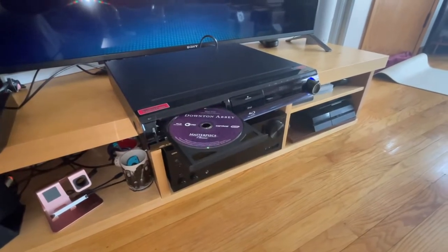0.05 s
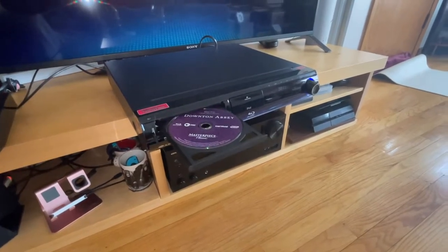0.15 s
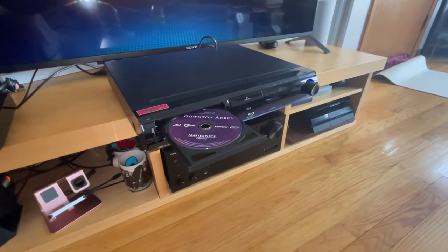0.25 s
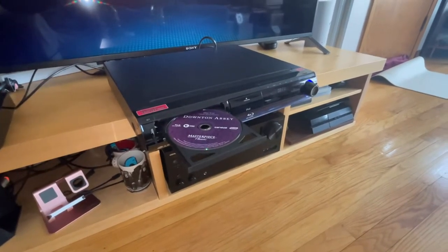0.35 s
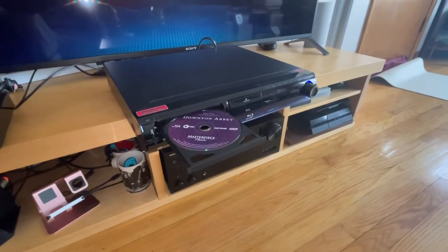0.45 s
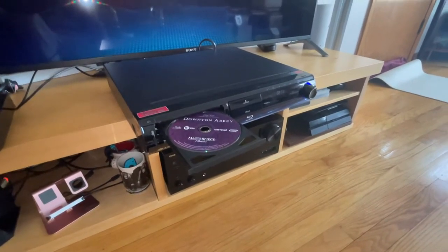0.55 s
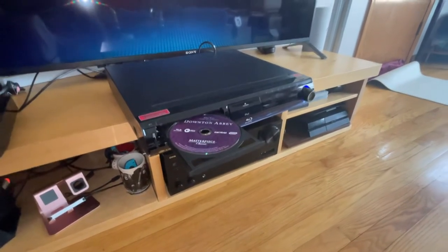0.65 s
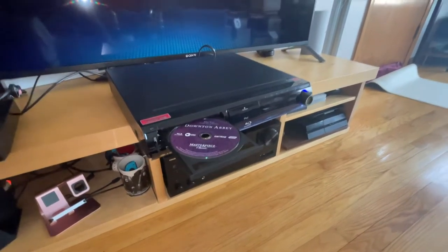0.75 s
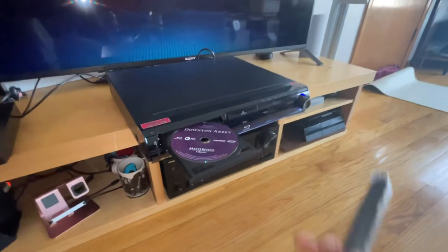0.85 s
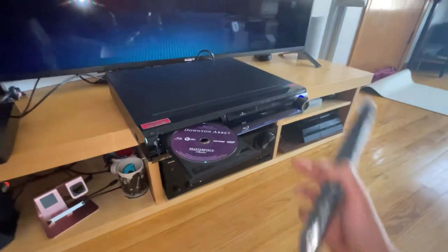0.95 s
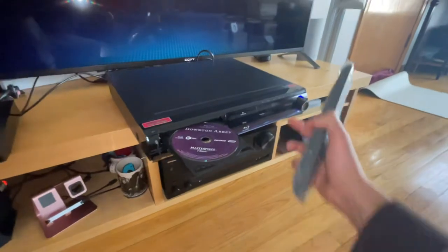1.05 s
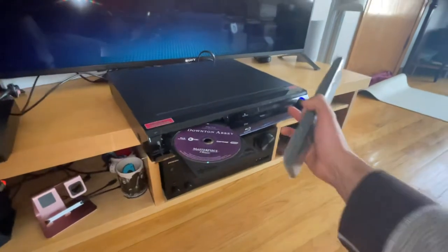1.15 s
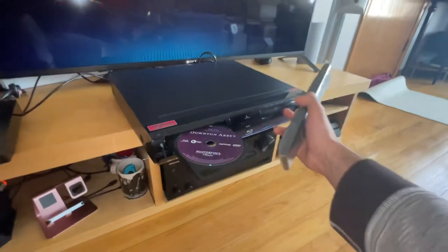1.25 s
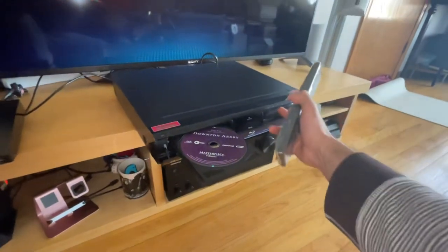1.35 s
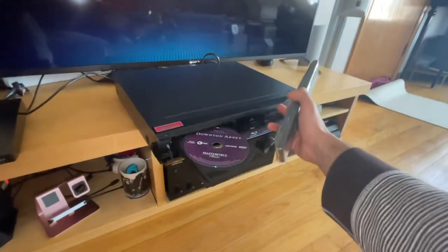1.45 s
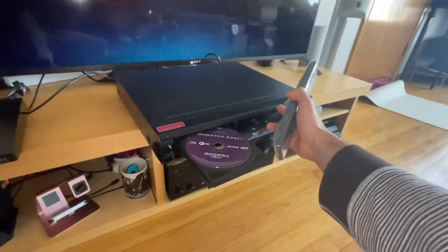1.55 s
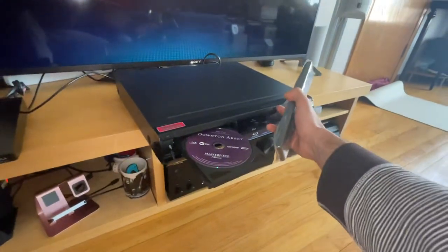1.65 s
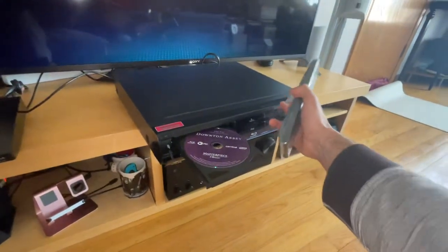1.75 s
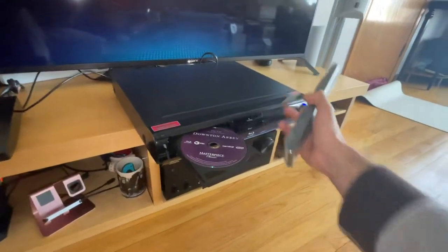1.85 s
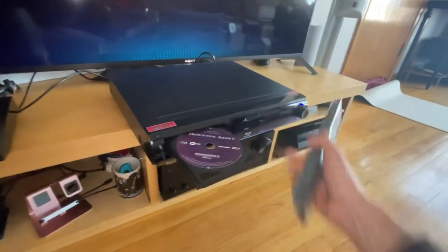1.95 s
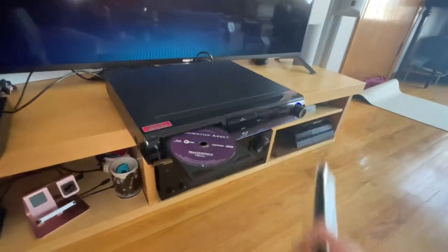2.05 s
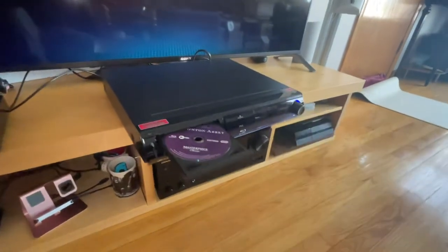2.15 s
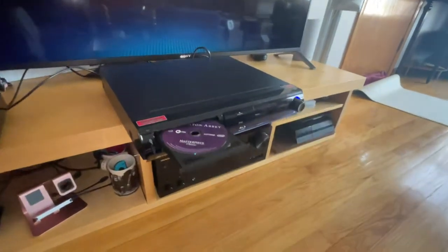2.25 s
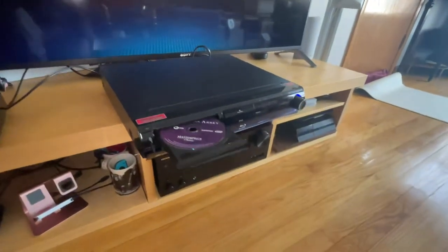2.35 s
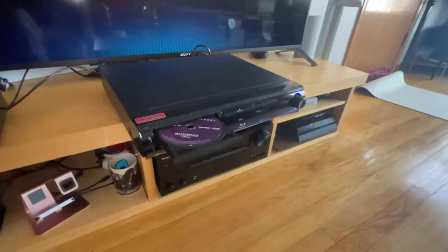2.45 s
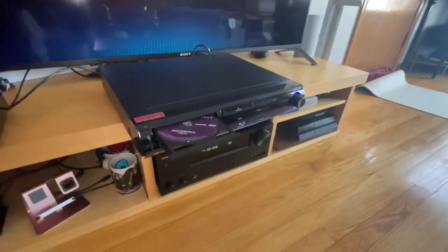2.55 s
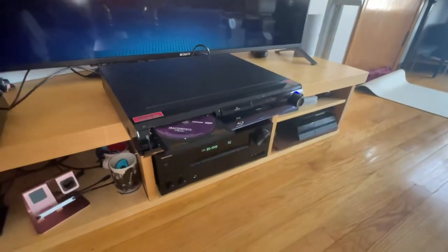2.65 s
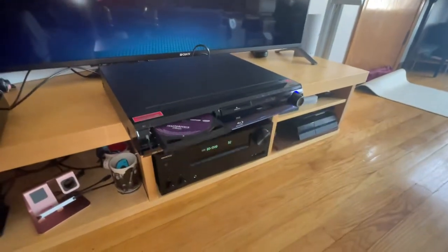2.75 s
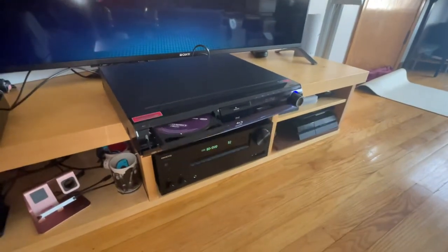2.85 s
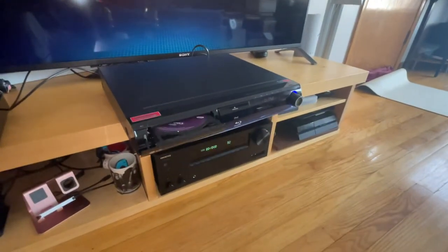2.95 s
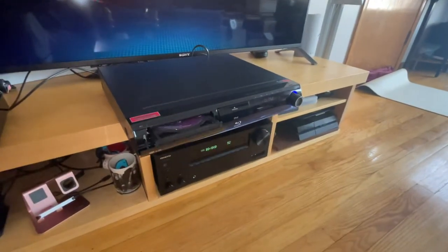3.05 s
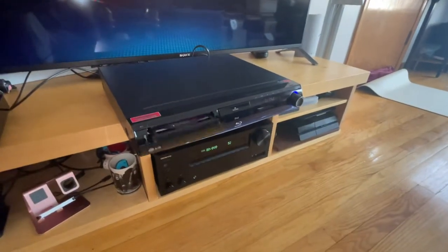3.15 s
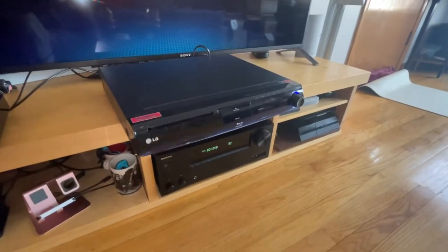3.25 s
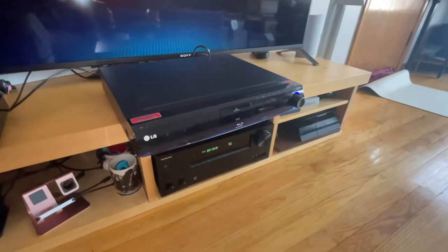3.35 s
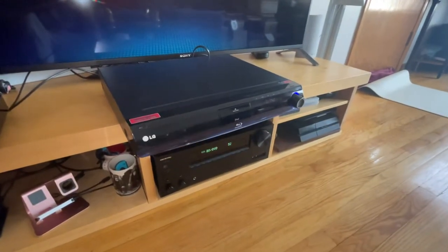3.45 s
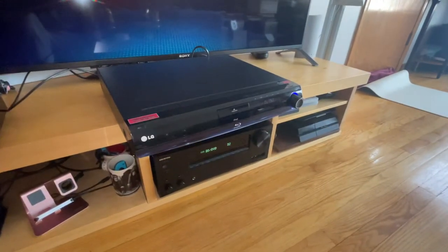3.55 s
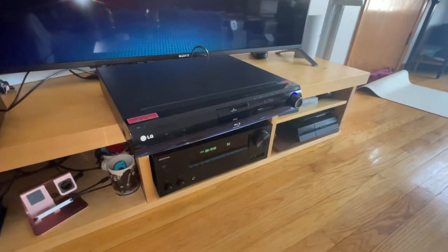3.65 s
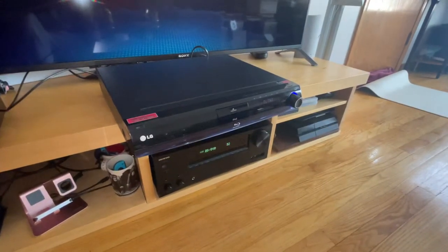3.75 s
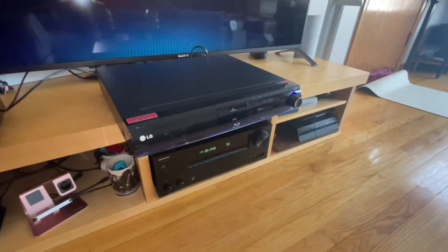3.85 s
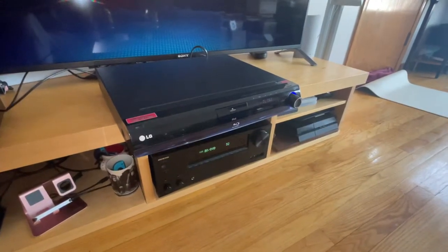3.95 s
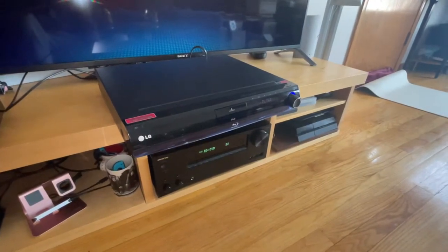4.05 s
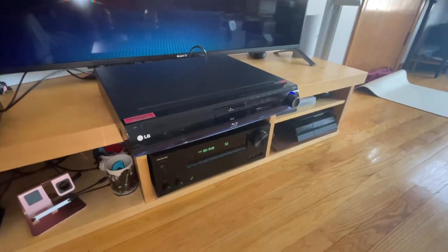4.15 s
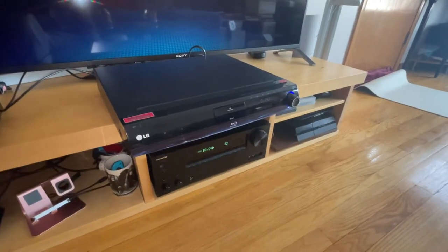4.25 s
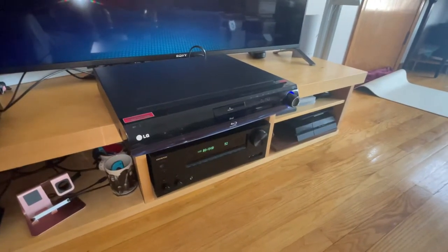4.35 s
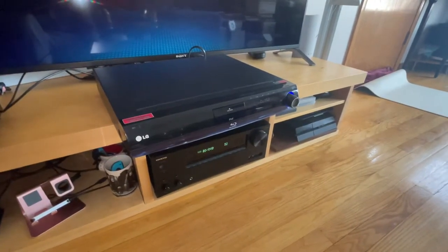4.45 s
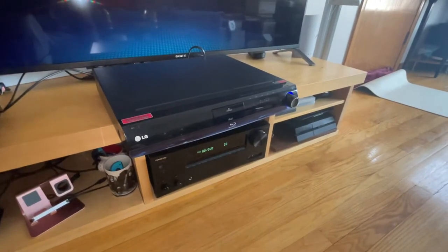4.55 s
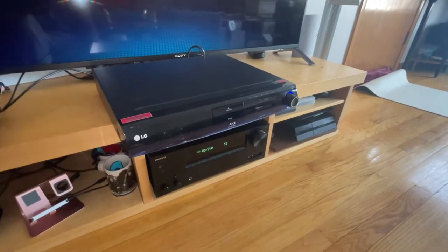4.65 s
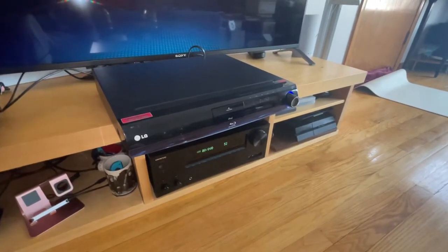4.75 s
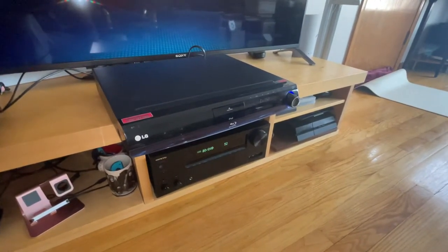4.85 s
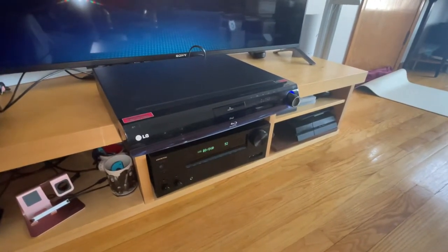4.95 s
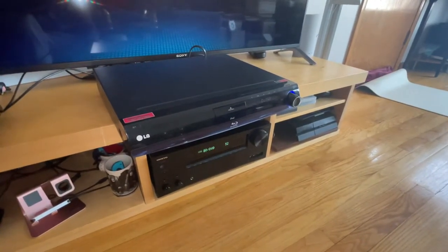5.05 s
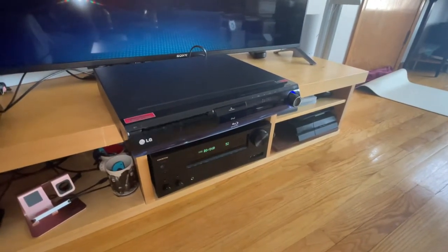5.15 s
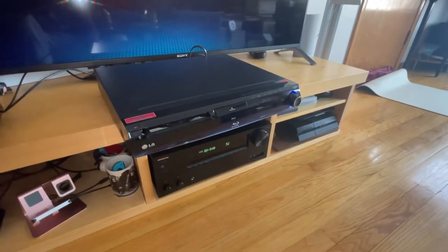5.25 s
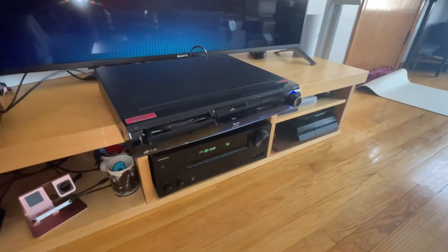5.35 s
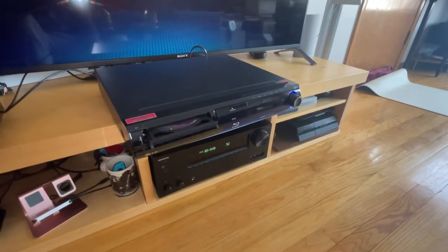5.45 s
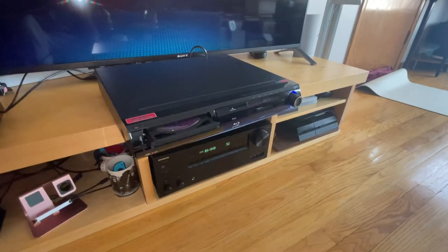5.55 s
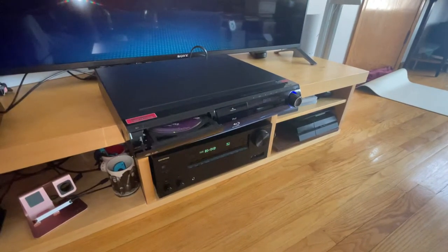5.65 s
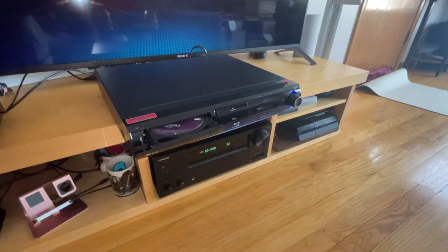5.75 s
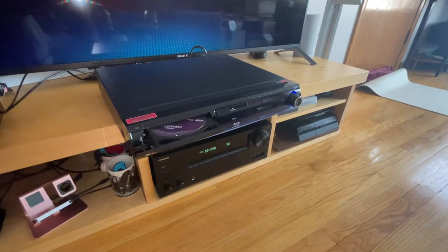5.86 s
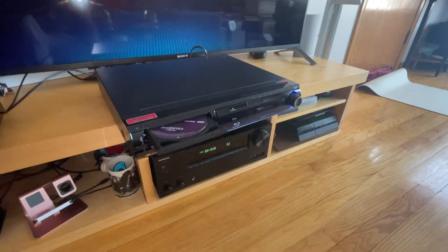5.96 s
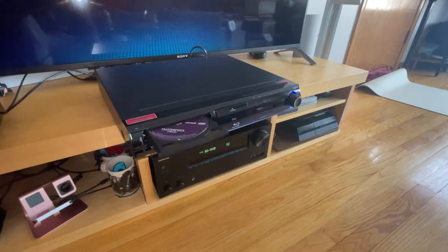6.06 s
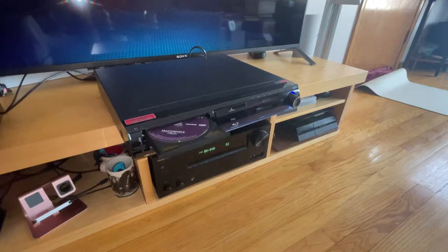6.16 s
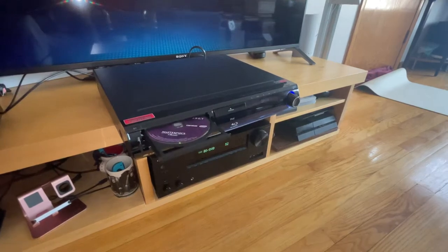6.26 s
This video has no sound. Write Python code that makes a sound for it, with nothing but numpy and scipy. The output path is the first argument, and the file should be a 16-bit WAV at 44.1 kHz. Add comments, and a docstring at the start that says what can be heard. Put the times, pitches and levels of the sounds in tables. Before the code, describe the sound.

A quiet, modest living room heard close up, with low rumble, faint air and electronic hum throughout. From 0 s a disc player's motor drones low and pulsing, its tones beating gently. Small plastic ticks at 0.4-0.5 s and 0.8 s mix with soft treble hiss swells; near 1 s a remote is picked up with a tiny dry scrape and tick. Sparse ticks follow around 1.3-1.7 s. At 2 s a knock and short judder start the tray, hissing and whirring inward while the motor sinks in pitch and fades by 2.9 s; a crisp double click lands at 2.46 s. At 3.14 s the latch snaps and rattles, then cracks hardest at 3.31 s with a bright ping and thuds. Near quiet, with faint ticks, until 4.88 s: dull bump, rapid clatter from 4.95 s, hollow clack at 5.05 s. From 5.2 s the tray slides out in softer hiss, with slight ticks, to the end at 6.3 s.

```python
"""Faulty disc player in a quiet living room: the latch snaps, its pawl pings, skipped teeth and judder
ring the chassis, the carriage thuds and clacks; all are contacts driving resonances, with a room tail.
The tray slides in and later out: fluttering hiss plus grains of gear contact. A motor, summed as
orders of its rotation, runs down. A hand lifts a remote: shell scrapes, plastic ticks.
Behind: brief swells of treble hiss, low rumble, faint air, electronic hum."""
import sys
import numpy as np
from scipy import signal
from scipy.fft import rfft, irfft, next_fast_len
from scipy.io import wavfile

SR = 44100
rng = np.random.default_rng(int(sys.argv[2]) if len(sys.argv) > 2 else 0)


def log_audio(samples):
    """Write samples as a 16-bit WAV file to the path given in sys.argv[1]."""
    # one column per channel
    frames = np.atleast_2d(samples).T
    # limit to full scale, then quantise
    limited = np.clip(frames, -1, 1)
    pcm = np.round(limited * 32767).astype(np.int16)
    wavfile.write(sys.argv[1], SR, pcm)


N = 278271
TIME = np.arange(N) / SR

# room reverberation: f/Hz, t60/s
ROOM_T60 = [(100, 0.59), (500, 0.417), (2000, 0.364), (6000, 0.343), (13000, 0.09)]
# left-right correlation of noise and tail: f/Hz, correlation/1
LIKENESS = [(50, 0.38), (150, 0.833), (300, 0.21), (600, -0.188), (1500, -0.231), (6000, 0.031),
            (14000, 0.09)]
# level of left over right: f/Hz, level/dB
LEFT_LEAD = [(110, .5), (200, -2), (350, -1.5), (550, -2.5), (900, 3), (1350, 4), (2300, .5), (4600, .5),
             (6500, 9), (8000, 5), (11000, .5)]
CUTOFF_HZ, TREBLE_EDGE_HZ = 16200, 12700

# electronics hum: f/Hz, level/dB
HUM = [(59.5, -62.5), (98.5, -65), (120, -74.5), (197.5, -68.5), (246, -70.5), (295, -80)]
# room rumble level over time: t/s, level/dB re RUMBLE_DB
RUMBLE_LEVEL = [(0, -51.5), (2.2, -48.5), (3, -55), (3.9, -54.5), (4.4, -58.5), (5.9, -56), (6.31, -61)]
RUMBLE_DB, AIR_DB = -1.0, -68.5   # overall levels
# rumble spectrum: f/Hz, relative level/dB
RUMBLE_COLOUR = [(25, -17), (40, -5.5), (56, -2.5), (80, -1), (120, -4), (170, -8), (250, -7), (330, -9.5),
                 (420, -23), (700, -28), (1500, -73.5)]
# air spectrum: f/Hz, relative level/dB
AIR_COLOUR = [(250, -30), (470, -0.5), (750, -6.5), (1300, -7), (2000, -18), (3100, -25), (4500, -31.5),
              (7000, -23), (9500, -38.5), (12000, -40.5), (15000, -65)]

# hiss swells: peak t/s, level/dB, rise/s per 20 dB, fall/s per 20 dB
HISS_SWELLS = [(.46, -65.5, 0.0645, 0.08), (.66, -66, 0.1945, 0.1251), (.87, -64.5, 0.0963, 0.0236),
               (.985, -62.5, 0.1324, 0.0977), (1.11, -69, 0.27, 0.59)]
# hiss swell spectrum: f/Hz, relative level/dB
HISS_COLOUR = [(600, -9), (1500, -0.5), (2700, -5.5), (4200, -5.5), (7500, -4), (9500, -3.5), (12000, -10),
               (14000, -23.5)]
# remote scrapes as it is picked up: peak t/s, level/dB
SCRAPES = [(.868, -67), (0.979, -55)]
# remote shell resonances: f/Hz, width/Hz, relative level/dB
SHELL_MODES = [(3954, 607, -2.5), (4496, 445, 0.5), (5510, 850, -5.5), (6580, 1240, -9)]
SCRAPE_RISE_S, SCRAPE_FALL_S = 0.0297, 0.0109   # per 20 dB
SLIPS_PER_S = 5000

# plastic ticks: t/s, snap level/dB, snap tilt/dB per octave, snap contact/s, knock level/dB, knock f/Hz
TICKS = [(.421, -43.5, 0, .0025, -50, 1200), (.442, -45, 1, .003, -50, 1284),
         (.484, -48, -1.5, .004, -51, 1100), (.793, -53, -2, .004, -45.5, 1423),
         (1.005, -51, 2, .002, -70, 1404), (1.318, -68, -3, .004, -52, 680),
         (1.563, -52, 3, .0035, -47.5, 1280), (1.645, -68, -3, .004, -55, 1490),
         (1.708, -53, -1, .004, -58, 1700), (1.9645, -47, -3.5, .007, -41, 1100),
         (1.969, -53, -3, .004, -34, 1440), (1.998, -60, -4, .005, -46, 1950),
         (2.040, -45, 4, .002, -54, 1155), (3.146, -50, -2, .005, -32, 2100),
         (3.565, -65, 0, .004, -62, 860), (3.614, -75, -3, .003, -43, 820),
         (3.945, -65, 0, .003, -66, 1200), (4.877, -56, -13, .012, -44, 1150),
         (4.949, -45, -4, .004, -34, 2000), (4.960, -54, -3, .003, -35, 1700),
         (4.992, -50, 0, .004, -35, 950), (5.020, -55, -3, .003, -42, 1100),
         (5.0545, -45, -1.5, .003, -42, 1120), (5.063, -45, -2, .002, -45, 1000),
         (5.299, -63, -4, .008, -50, 1750), (5.315, -65, -4, .007, -50, 1600),
         (5.486, -68, -3, .005, -50, 1070)]
# tick snap resonances: f/Hz, width/Hz, relative level/dB
SNAP_MODES = [(2500, 1400, -1), (4400, 1800, 0), (6800, 2200, 0), (11000, 4500, -3)]
# hollow knock resonances: ratio to knock f/1, width/Hz, relative level/dB
KNOCK_MODES = [(.65, 300, -6), (.96, 130, 4), (1.12, 178, -0.5), (1.65, 550, -10.5)]
KNOCK_CONTACT_S, KNOCK_EDGE_RATIO = .0026, 1.6   # dull above this multiple of its pitch

# tray clicks over its guide: t/s, level/dB
GUIDE_CLICKS = [(2.4595, -37.5), (2.4622, -34.5)]
# guide resonances: f/Hz, width/Hz, relative level/dB
GUIDE_MODES = [(990, 110, 9), (1900, 300, -2), (2790, 300, -3), (3700, 400, -3), (4470, 350, 2),
               (6400, 600, 1), (7450, 700, 1), (8400, 400, 0), (9350, 400, -4), (11100, 600, -5)]
# carriage drops free, clack and bounce: t/s, level/dB
CLACKS = [(5.0545, -28), (5.0635, -37)]
# carriage resonances: f/Hz, width/Hz, relative level/dB
CLACK_MODES = [(497, 22, 0), (592, 28, 1), (850, 150, -10), (1045, 55, -2.5), (1135, 65, -.5),
               (1250, 90, -9), (1420, 80, -15), (1810, 100, -17), (2320, 80, -17)]

# tray runs in, then out: start t/s, stop t/s, settled level/dB, settling time/s
TRAY_RUNS = [(1.965, 3.2, -70.5, 0.68), (5.222, 6.31, -75.5, 0.334)]
TRAY_SURGE_DB = 6.0   # extra level at first
TRAY_START_S, TRAY_STOP_S = 0.094, .35   # per 20 dB
# tray binds on its rails before the latch: peak t/s, level/dB, rise/s per 20 dB, fall/s per 20 dB
BIND = (3.12, -59, .05, .03)
# tray hiss spectrum: f/Hz, relative level/dB
SLIDE_COLOUR = [(400, 8), (900, 7.5), (1500, -1), (2200, -1), (3200, -16), (5000, -5), (7200, -16),
                (9500, -5.5), (12000, -12.5), (14000, -59)]
# gear and rail whirr resonances: f/Hz, width/Hz, relative level/dB per root Hz of width
WHIRR_MODES = [(2050, 300, 7), (3400, 600, -.5), (3900, 500, -1), (6000, 700, -1.5), (7150, 700, -2),
               (8150, 350, 1), (9800, 600, -3), (11450, 800, -4)]
WHIRR_GRAINS_PER_S, WHIRR_SPREAD_DB = 700, 3.5
WHIRR_DB, WHIRR_FLICKER_DB = -4.0, 3.0   # level re hiss; each resonance flickers as the load shifts

# motor speed: t/s, speed/turns per s
SPEED = [(0, 12.58), (.4, 12.76), (1, 12.86), (1.65, 13.0), (1.85, 12.69), (2.1, 12.0), (2.4, 11.35),
         (2.65, 9.9), (2.9, 8.8)]
FULL_TURNS_PER_S = 12.8
SPEED_POWER = 5.76   # vibration grows with this power of speed
# strong orders: multiple/1, level/dB, creep/dB per s, dip t/s, dip depth/dB, dip half-width/s
STRONG_ORDERS = [(5, -42, 0, 1.797, 20, 0.412), (8, -39.5, -3, 1.07, 14.5, 0.592),
                 (11, -55.5, 0, 0.23, 11.5, 0.33), (16, -58.5, 3, 0.697, 14, 0.277)]
# weaker orders, swelling and fading together: multiple/1, level/dB re UPPER_DB
UPPER_ORDERS = [(7, -0.5), (13, 0.5), (14, -7), (18, -2), (20, -3.5), (21, 1), (24, -8), (26, -11),
                (29, -11), (32, -22)]
UPPER_DB, UPPER_PEAK_S, UPPER_FADE_DB_PER_S, UPPER_WAVER_DB = -57.5, .6, 5.0, 1.5

# carriage bumps its stops, a panel booms: t/s, level/dB, f/Hz, width/Hz
THUDS = [(3.14, -41, 305, 12), (3.3125, -31, 520, 55), (3.331, -33, 580, 35), (3.356, -38, 310, 20),
         (3.374, -40, 400, 70), (4.879, -47, 304, 40), (4.904, -44, 340, 25), (4.992, -37, 377, 50),
         (5.018, -34, 260, 60), (5.085, -44, 335, 14), (5.303, -51, 370, 20), (5.489, -55, 480, 25)]
# pawl hits as the latch catches: t/s, level/dB
PAWL_HITS = [(3.138, -36.5), (3.157, -37), (3.3116, -20)]
# sprung pawl resonances: f/Hz, width/Hz, relative level/dB
PAWL_MODES = [(6400, 170, 8), (6850, 300, 3), (12480, 600, -6), (15800, 500, -17)]
# gear teeth judder as the drive takes up a load, shifting the chassis resonances:
# peak t/s, level/dB, rise/s per 20 dB, fall/s per 20 dB, hold/s, pitch ratio/1, tilt/dB per octave, contacts/s
JUDDERS = [(1.972, -54.5, .04, .06, .03, 1.25, .3, 1000), (3.145, -52.5, .07, .17, .04, .97, 1.3, 1200),
           (3.335, -42.5, .03, .05, .056, .97, .2, 1400), (3.43, -61, .05, .1, .02, 1.0, .5, 1500),
           (4.885, -54, .02, .06, .045, 1.02, -.5, 1200), (4.954, -53, .01, .06, .02, 1.35, 3.3, 900),
           (4.978, -43, .04, .02, .046, .98, -2.2, 500), (5.08, -52, .03, .09, .035, 1.0, -3.5, 1200),
           (5.18, -66, .2, .45, .02, 1.0, 0, 1500)]
# chassis resonances: f/Hz, width/Hz, relative level/dB
CHASSIS_MODES = [(125, 30, -5), (222, 50, -5), (305, 45, 2), (350, 50, 1.5), (420, 60, -3.5), (495, 45, 1),
                 (548, 50, 0), (640, 60, -2.5), (750, 100, -9), (925, 60, -3), (1000, 100, -4),
                 (1100, 80, -5), (1215, 75, -6), (1390, 110, -10), (1584, 110, -15), (1820, 140, -18),
                 (2070, 160, -17), (2420, 90, -19), (2830, 390, -27)]
# cam skips teeth in a row, each blow a step from the last:
# t/s, teeth/1, spacing/s, snap level/dB, snap step/dB, chassis level/dB, chassis step/dB, contact/s
SKIPS = [(3.102, 2, 0.019, -52, 18, -50, 8, 0.0043), (3.137, 2, 0.01818, -22, -3, -36, 3.5, 0.00222),
         (3.311, 3, .0215, -21, -14, -28, -3, 0.00299), (4.876, 2, .036, -68, -8.5, -42, -2, 0.009),
         (4.9485, 4, .0222, -38, -3, -46, 2, 0.004), (5.054, 2, .01, -50, 5, -42, -3, 0.00137)]
# plastic latch resonances: f/Hz, width/Hz, relative level/dB
LATCH_MODES = [(1234, 339, -3), (2090, 330, 0), (2750, 500, -7.5), (3400, 700, -11), (4400, 900, -8),
               (5840, 1350, -7), (6438, 872, -4), (7137, 700, -8), (8653, 850, -13), (9660, 1400, -18),
               (12000, 1700, -16)]


def from_db(db):
    """Decibels to gain."""
    return 10 ** (np.asarray(db) / 20)


def rms_one(x):
    """Scale to rms 1."""
    return x / np.sqrt(np.mean(x ** 2) + 1e-20)


def in_time(rows):
    """Each column of a curve at every sample."""
    s, *columns = np.transpose(rows)
    return [np.interp(TIME, s, c) for c in columns]


def at_hz(points, hz):
    """Read a spectrum on a log-frequency axis."""
    table_hz, values = np.array(points).T
    return np.interp(np.log(hz), np.log(table_hz), values)


def drift(rate_hz):
    """Slow random motion of spread 1: noise at SR / 40 through a double pole."""
    r = np.exp(-80 * np.pi * rate_hz / SR)
    white = rng.standard_normal(N // 40 + 2002)
    slow = signal.lfilter([1], [1, -2 * r, r * r], white)[2000:]   # drop the filter's start
    return np.interp(np.arange(N) / 40, np.arange(len(slow)), rms_one(slow))


def swell(peak_s, db, rise_s, fall_s, hold_s=0):
    """Gain that rises to a peak, holds and dies away; rise and fall are times per 20 dB."""
    rising = np.maximum(peak_s - TIME, 0) / rise_s
    falling = np.maximum(TIME - peak_s - hold_s, 0) / fall_s
    return from_db(db - 20 * np.minimum(rising + falling, 10))


def swells(rows):
    """Joint gain of several swells, added in power."""
    return np.sqrt(sum(swell(*row) ** 2 for row in rows))


def noise_bands(size):
    """Half-octave bands of stereo noise, mixed from mid and side by their correlation: (Hz, band)."""
    edges = 27 * 2 ** np.arange(0, 9.6, .5)
    white = rng.standard_normal((2, 2, size))
    for k, (low, high) in enumerate(zip(edges, edges[1:])):
        sos = signal.butter(3, [low, high], "band", fs=SR, output="sos")
        mid, side = signal.sosfilt(sos, white[k % 2])   # neighbouring bands use separate noise
        hz = np.sqrt(low * high)
        alike = np.clip(at_hz(LIKENESS, hz), -1, 1)
        yield hz, np.sqrt(1 + alike) * mid + np.sqrt(1 - alike) * side * [[1], [-1]]


def noise(colour):
    """Stereo noise of a given spectrum, rms 1."""
    return rms_one(sum(from_db(at_hz(colour, hz)) * band for hz, band in noise_bands(N)))


def fluttering_hiss(gain, colour, grain_db, flutter_db):
    """Coloured noise whose level flutters, each band also in its own way."""
    hiss = sum(band * from_db(at_hz(colour, hz) + grain_db * drift(19)) for hz, band in noise_bands(N))
    return rms_one(hiss) * gain * from_db(flutter_db * drift(54))


def resonate(force, modes):
    """Parallel resonances, scaled so that a unit click peaks at 1."""
    def bank(x):
        out = 0
        for k, (hz, width_hz, db) in enumerate(modes):
            r = np.exp(-np.pi * width_hz / SR)
            poles = [1, -2 * r * np.cos(2 * np.pi * hz / SR), r * r]
            ring = (1 - r * r) * signal.lfilter([1, 0, -1], poles, x + 1e-18)
            out = out + (-1) ** k * from_db(db) * ring
        return out
    return bank(force) / np.abs(bank(signal.unit_impulse(SR // 20))).max()


def retuned(modes, ratio, tilt_db):
    """Resonances shifted in pitch and tilted per octave."""
    return [(hz * ratio, width_hz, db + tilt_db * np.log2(hz / modes[0][0])) for hz, width_hz, db in modes]


def contacts(times_s, levels_db, lengths_s, chatter):
    """Each contact is a push amid a brief dying chatter of the surfaces."""
    force, age = np.zeros(N), TIME[:SR // 16]
    for s, db, length_s in zip(times_s, levels_db, lengths_s):
        envelope = np.exp(-age / length_s) * (1 - np.exp(-2 * age / length_s))
        push = rng.standard_normal(len(age)) * envelope
        push *= chatter / np.linalg.norm(push)
        push[np.argmax(age >= length_s / 4)] += np.exp(-length_s / 0.00371)   # long contacts are soft
        start = round(s * SR)
        force[start:start + len(age)] += from_db(db) * push
    return force


def strike(s, db, length_s, modes, chatter):
    """One contact rings a set of resonances."""
    out, start = np.zeros(N), round(s * SR)
    span = slice(start, start + SR // 4)
    out[span] = resonate(contacts([s], [db], [length_s], chatter)[span], modes)
    return out


def in_room(x, pan_db, wet_db, lag_s=0.00028):
    """Direct sound reaches the left side first; floor and walls add a diffuse tail."""
    age = TIME[:SR // 2]
    tail = sum(band * from_db(-60 * age / at_hz(ROOM_T60, hz)) for hz, band in noise_bands(len(age)))
    tail = tail * (1 - np.exp(-(age / 0.0015) ** 2))
    tail /= np.linalg.norm(tail, axis=1, keepdims=True)
    left = x * from_db(pan_db / 2)
    right = np.interp(TIME - lag_s, TIME, x) * from_db(-pan_db / 2)
    reverb = signal.fftconvolve(x[None], tail, axes=1)[:, :N]
    return np.array([left, right]) + from_db(wet_db) * reverb


def soften(x):
    """Low-pass: dull above TREBLE_EDGE_HZ."""
    return signal.sosfilt(signal.butter(14, TREBLE_EDGE_HZ, fs=SR, output="sos"), x)


def steer(x, left_lead):
    """Set the left-right level difference per frequency, half on each side."""
    size = next_fast_len(N)
    lead_db = at_hz(left_lead, np.maximum(np.fft.rfftfreq(size, 1 / SR), 1))
    side_gains = from_db(lead_db * np.array([[.5], [-.5]]))
    return irfft(rfft(x, size) * side_gains, size)[:, :N]


def background():
    """Low rumble, faint air and electronic hum of wavering phase."""
    rumble_db, = in_time(RUMBLE_LEVEL)
    rumble = noise(RUMBLE_COLOUR) * from_db(rumble_db + RUMBLE_DB)
    hum = 0
    for hz, db in HUM:
        hum = hum + np.sqrt(2) * from_db(db) * np.sin(2 * np.pi * hz * TIME + 1.27 * drift(0.95))
    return rumble + hum + noise(AIR_COLOUR) * from_db(AIR_DB)


def hiss_swells():
    """Brief swells of fluttering treble hiss."""
    return fluttering_hiss(swells(HISS_SWELLS), HISS_COLOUR, grain_db=1.03, flutter_db=1.03)


def remote():
    """Tiny dense slips excite the plastic shell of the remote."""
    slips = (rng.random(N) < SLIPS_PER_S / SR) * rng.standard_normal(N)
    gain = swells([(s, db, SCRAPE_RISE_S, SCRAPE_FALL_S) for s, db in SCRAPES])
    scrape = rms_one(resonate(slips, SHELL_MODES)) * gain
    return in_room(scrape, pan_db=1.5, wet_db=-12.5, lag_s=.00002)   # close by, so nearly dry


def hollow_knock(s, db, hz):
    """A short woody knock around one pitch."""
    modes = [(ratio * hz, width_hz, mode_db) for ratio, width_hz, mode_db in KNOCK_MODES]
    ring = strike(s, db, KNOCK_CONTACT_S, modes, chatter=.55)
    edge_hz = min(KNOCK_EDGE_RATIO * hz, SR / 4)
    return signal.sosfilt(signal.butter(2, edge_hz, fs=SR, output="sos"), ring + 1e-18)


def ticks():
    """Plastic parts tick: a broad snap with its own brightness, and a hollow knock at its own pitch."""
    snap, knock = 0, 0
    for s, snap_db, tilt_db, length_s, knock_db, knock_hz in TICKS:
        snap = snap + strike(s, snap_db, length_s, retuned(SNAP_MODES, 1, tilt_db), chatter=1.787)
        knock = knock + hollow_knock(s, knock_db, knock_hz)
    snap = in_room(snap, pan_db=1.5, wet_db=-4.5, lag_s=.00003)
    return snap + in_room(knock, pan_db=2.0, wet_db=-5.0, lag_s=.00008)


def clacks():
    """Clean, hard contacts: the tray on its guide, and the carriage dropping free."""
    guide = sum(strike(s, db, .001, GUIDE_MODES, chatter=.3) for s, db in GUIDE_CLICKS)
    carriage = sum(strike(s, db, .0008, CLACK_MODES, chatter=.08) for s, db in CLACKS)
    guide = in_room(guide, pan_db=1.0, wet_db=-5.0, lag_s=.00002)
    return guide + in_room(carriage, pan_db=0.5, wet_db=-8.0, lag_s=.00006)


def tray_gain():
    """Each run starts with a surge of friction, settles and stops."""
    gain = 0
    for start_s, stop_s, db, settle_s in TRAY_RUNS:
        run = swell(start_s, db, TRAY_START_S, TRAY_STOP_S, stop_s - start_s)
        surge = np.exp(-(np.maximum(TIME - start_s, 0) / settle_s) ** 2)
        gain = gain + run * from_db(TRAY_SURGE_DB * surge)
    return gain


def whirr():
    """Uneven grains of gear contact ring the plastic, each resonance flickering on its own."""
    sizes = from_db(WHIRR_SPREAD_DB * np.minimum(rng.exponential(1, N), 4)) * rng.choice([-1, 1], N)
    grains = sizes * (rng.random(N) < WHIRR_GRAINS_PER_S / SR)
    rings = 0
    for k, (hz, width_hz, db) in enumerate(WHIRR_MODES):
        ring = (-1) ** k * np.sqrt(width_hz) * rms_one(resonate(grains, [(hz, width_hz, 0)]))
        rings = rings + ring * from_db(db + WHIRR_FLICKER_DB * drift(9))
    return rms_one(in_room(rings, pan_db=1.0, wet_db=-1.5, lag_s=.00003))


def tray():
    """Rail friction hisses as surfaces catch and slip, and gears whirr, under one wavering gain."""
    gain = (tray_gain() + swell(*BIND)) * from_db(drift(2.5))   # wavers with 1 dB spread
    hiss = fluttering_hiss(gain, SLIDE_COLOUR, grain_db=1.3, flutter_db=.6)
    return hiss + whirr() * gain * from_db(WHIRR_DB)


def motor():
    """Orders of the rotation shake the cabinet; they sink in pitch and fade as the motor runs down."""
    speed, = in_time(SPEED)
    angle = 2 * np.pi * np.cumsum(speed) / SR
    orders = []
    for k, db, creep, dip_s, depth_db, width_s in STRONG_ORDERS:
        dip_db = depth_db * np.exp(-((TIME - dip_s) / width_s) ** 2)
        orders.append((k, db + creep * TIME - dip_db))
    upper_db = UPPER_DB - UPPER_FADE_DB_PER_S * np.abs(TIME - UPPER_PEAK_S)
    for k, db in UPPER_ORDERS:
        orders.append((k, upper_db + db + UPPER_WAVER_DB * drift(1.6)))
    out = 0
    for k, db in orders:
        phase = rng.uniform(0, 2 * np.pi) + np.array([[.3], [-.3]])   # left, right
        out = out + np.sqrt(2) * from_db(db) * np.sin(round(k) * angle + phase)
    return out * (speed / FULL_TURNS_PER_S) ** SPEED_POWER * np.interp(TIME, [2.65, 2.9], [1, 0])


def thuds():
    """The carriage bumps its stops: each short contact rings one panel resonance."""
    booms = sum(strike(s, db, .001, [(hz, width_hz, 0)], chatter=.1) for s, db, hz, width_hz in THUDS)
    return in_room(booms, pan_db=-.6, wet_db=-11.0)


def pawl():
    """The sprung pawl pings in narrow high resonances as the latch catches."""
    s, db = np.transpose(PAWL_HITS)
    ping = resonate(contacts(s, db, np.full(len(s), .0012), chatter=.35), PAWL_MODES)
    return in_room(ping, pan_db=2.0, wet_db=-21.0)


def judder():
    """Tooth contacts shake the chassis, with a density and tuning of their own under each load."""
    chance, signs, out = rng.random(N), rng.choice([-1, 1], N), np.zeros(N)
    for s, *shape, ratio, tilt_db, per_s in JUDDERS:
        peak = round(s * SR)
        span = slice(peak - SR // 4, peak + SR // 2)
        teeth = (chance < per_s / SR) * signs * swell(s, *shape)
        out[span] += resonate(teeth[span], retuned(CHASSIS_MODES, ratio, tilt_db))
    return out


def blows():
    """One blow for each skipped tooth: (s, snap dB, chassis dB, contact s)."""
    rows = []
    for s, teeth, spacing_s, snap_db, snap_step, chassis_db, chassis_step, length_s in SKIPS:
        for k in range(round(teeth)):
            rows.append((s + k * spacing_s, snap_db + k * snap_step, chassis_db + k * chassis_step, length_s))
    return rows


def mechanism():
    """Blows of skipped teeth snap the latch and, with judder, ring the chassis; pawl and thuds join."""
    s, snap_db, chassis_db, length_s = np.transpose(blows())
    latch = resonate(contacts(s, snap_db, length_s, chatter=1.058), LATCH_MODES)
    chassis = resonate(contacts(s, chassis_db, length_s, chatter=0.442), CHASSIS_MODES) + judder()
    rattle = in_room(latch, pan_db=1.5, wet_db=-5.5) + in_room(chassis, pan_db=1.0, wet_db=-6.5)
    return soften(rattle) + thuds() + pawl()


def scene():
    """Everything in the living room; the motor alone bypasses the steering."""
    softened = soften(ticks() + clacks() + remote() + tray() + hiss_swells())
    return motor() + steer(mechanism() + softened + background(), LEFT_LEAD)


def record(dry):
    """The top is cut steeply."""
    return signal.sosfilt(signal.ellip(10, .1, 80, CUTOFF_HZ, fs=SR, output="sos"), dry)


dry = scene()
out = record(dry)
log_audio(out)
```